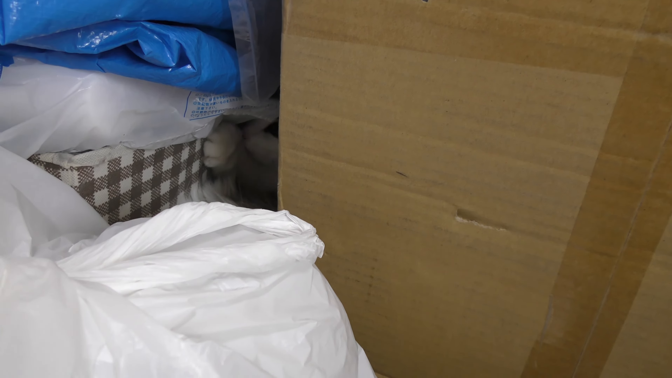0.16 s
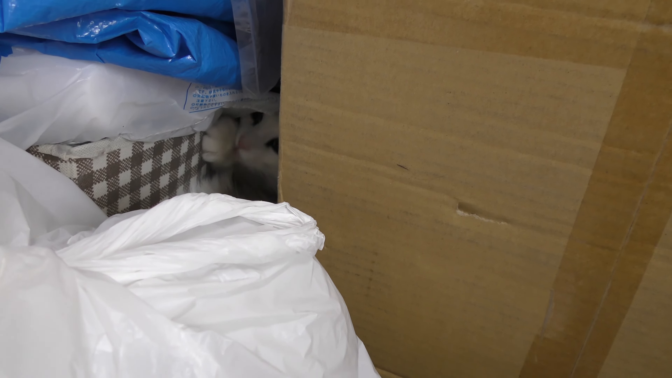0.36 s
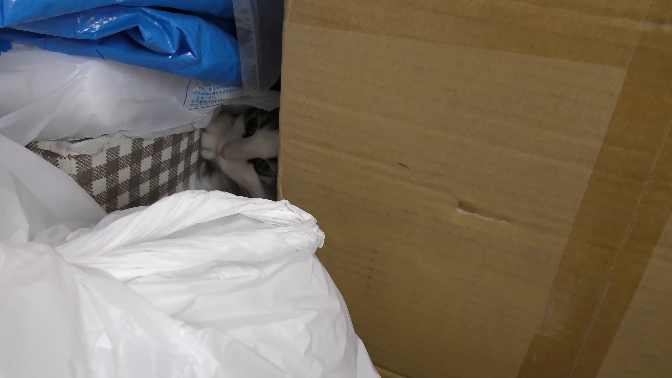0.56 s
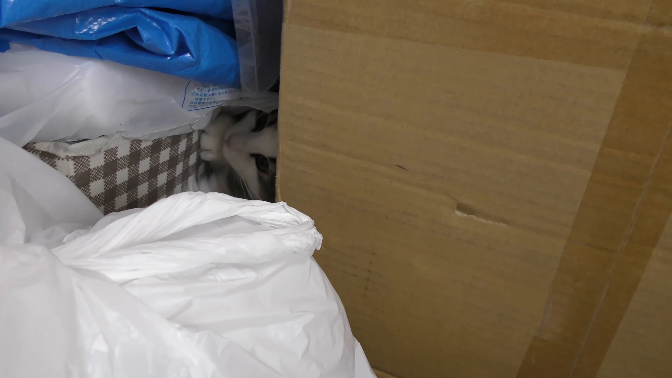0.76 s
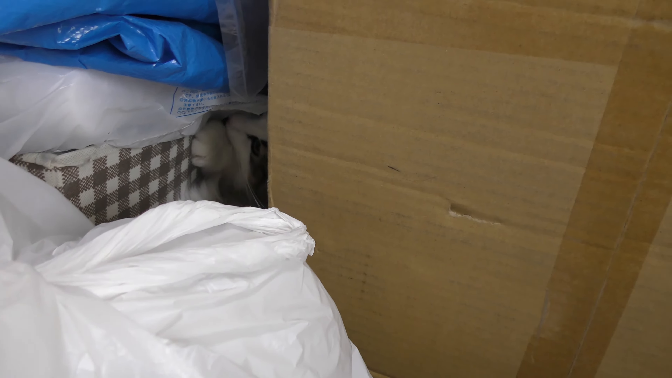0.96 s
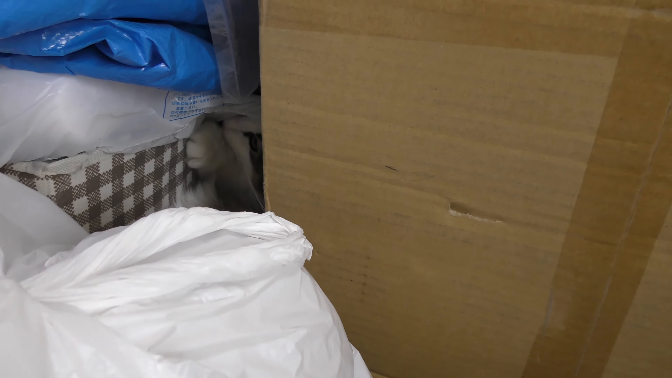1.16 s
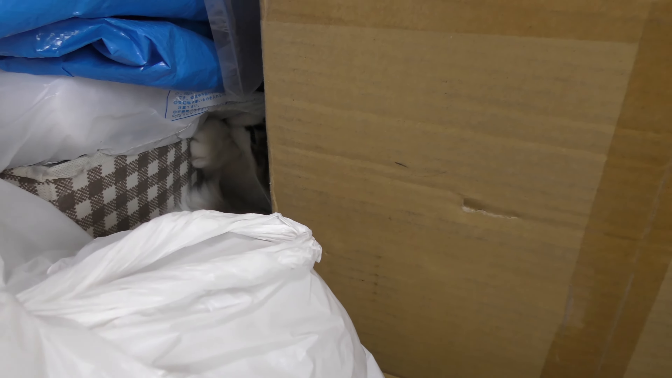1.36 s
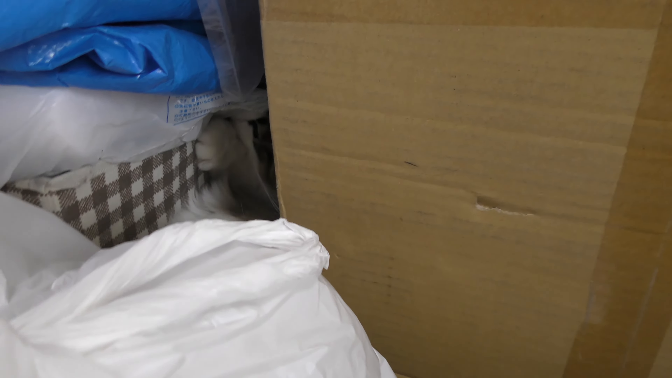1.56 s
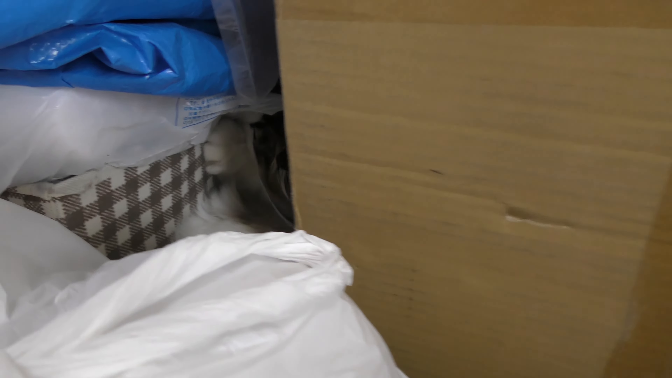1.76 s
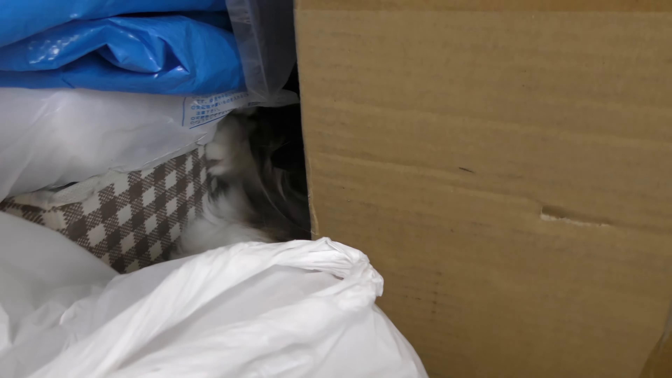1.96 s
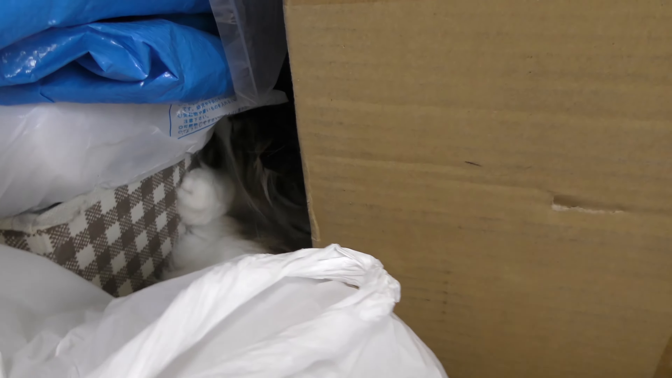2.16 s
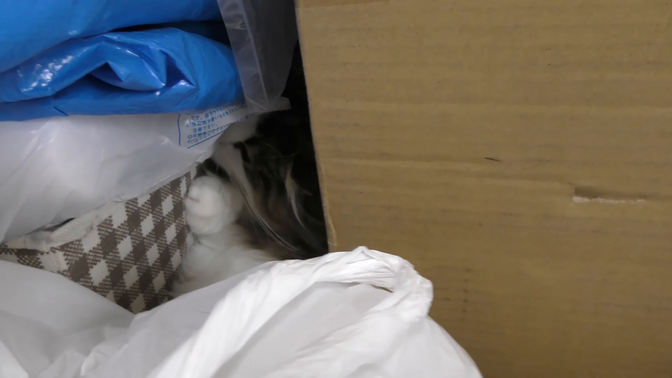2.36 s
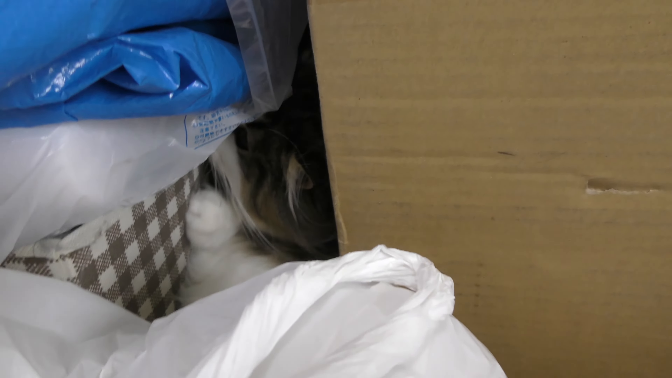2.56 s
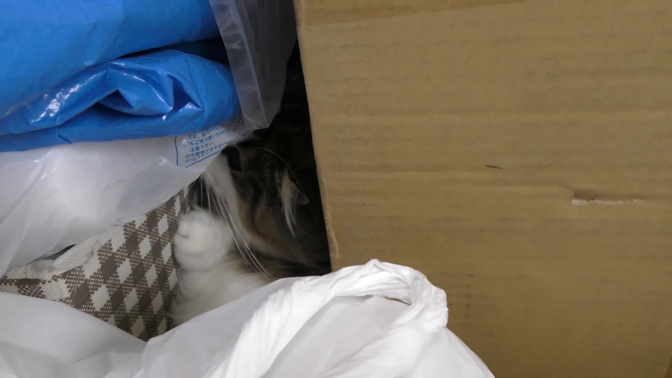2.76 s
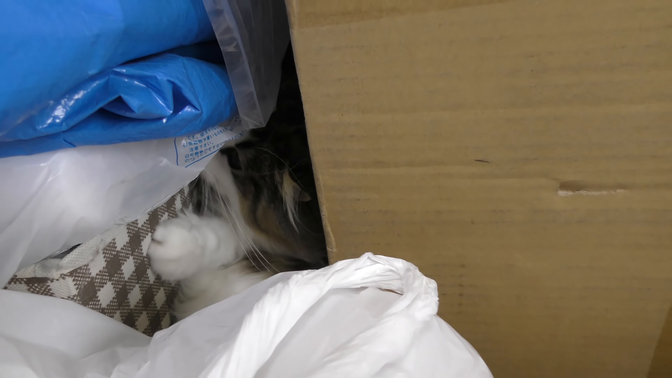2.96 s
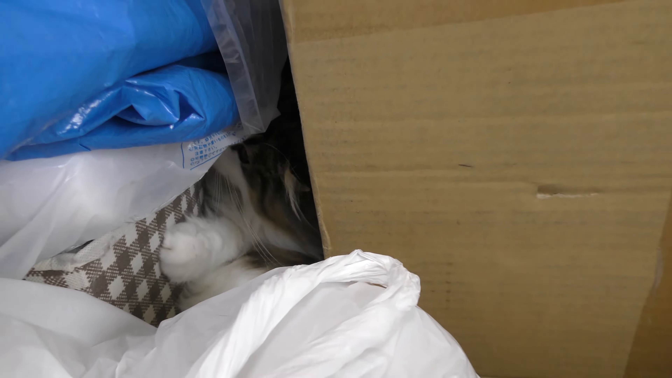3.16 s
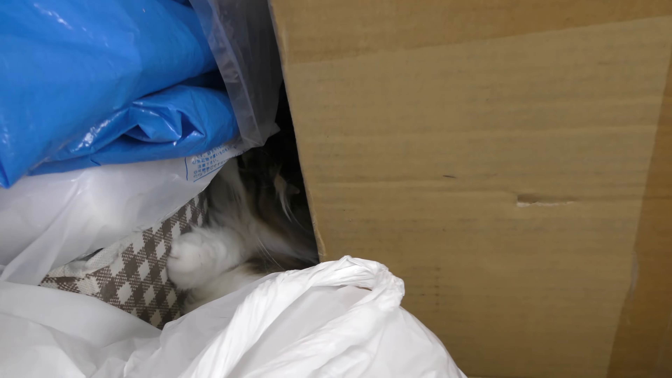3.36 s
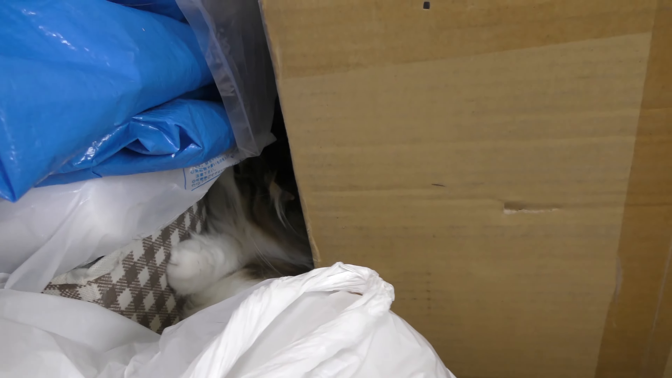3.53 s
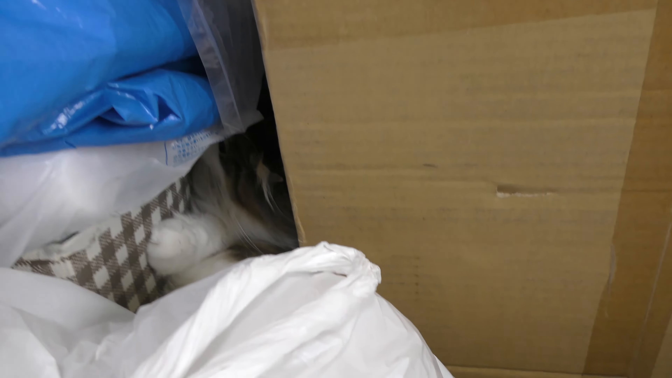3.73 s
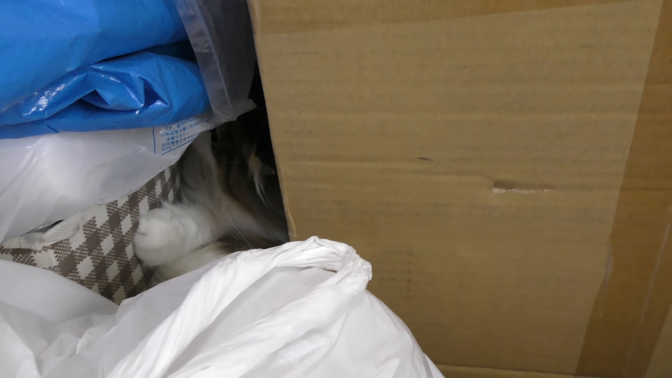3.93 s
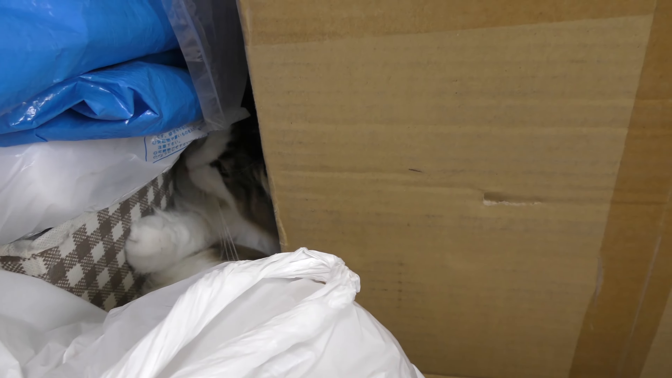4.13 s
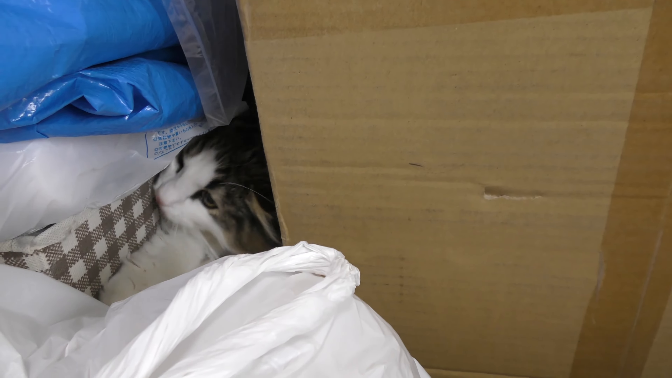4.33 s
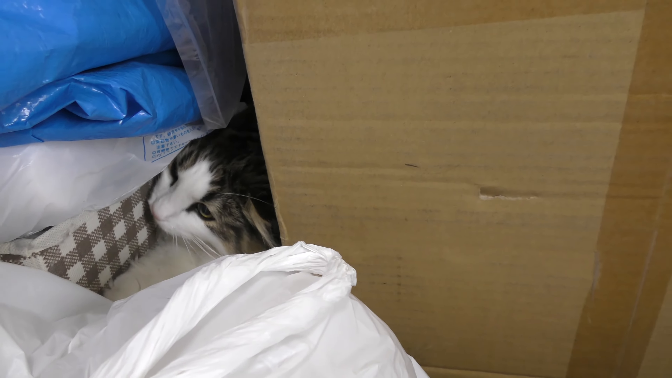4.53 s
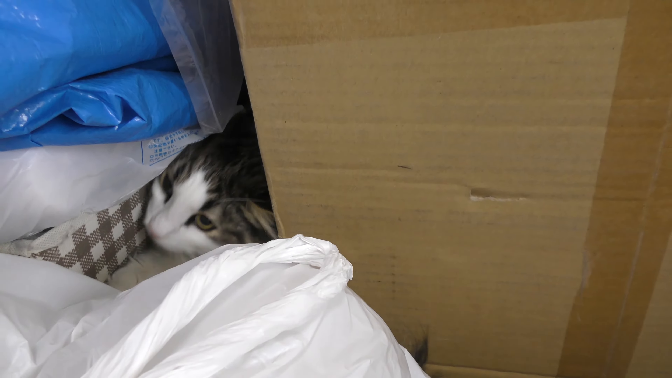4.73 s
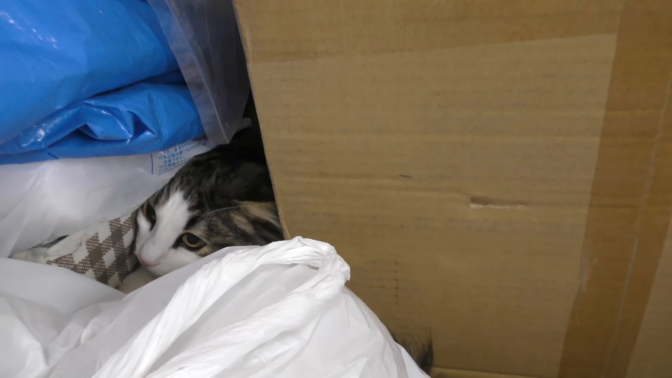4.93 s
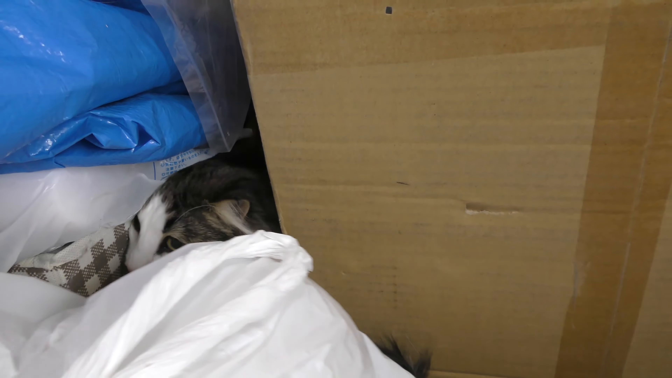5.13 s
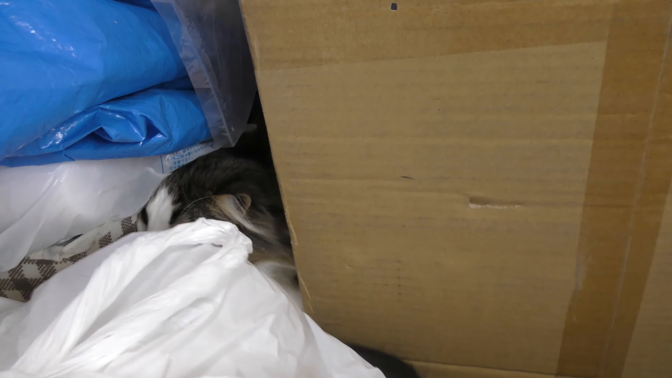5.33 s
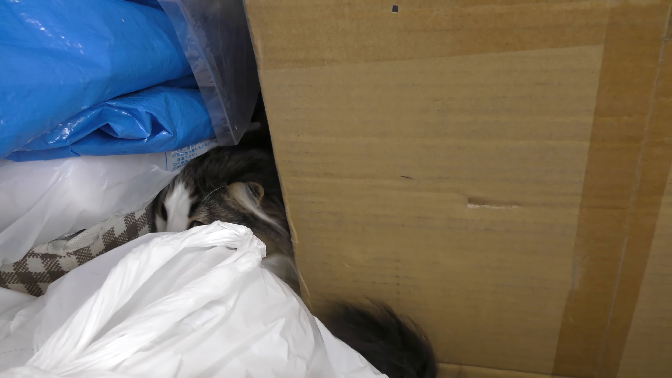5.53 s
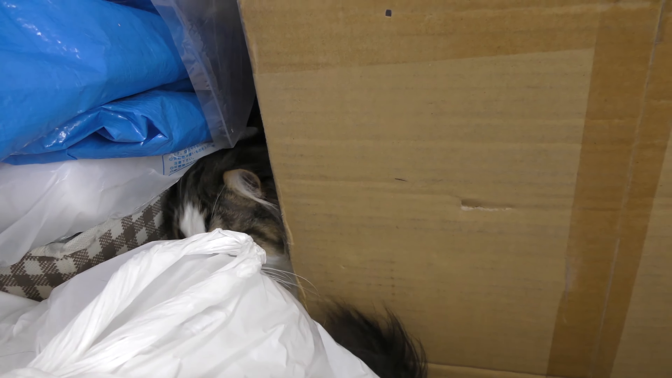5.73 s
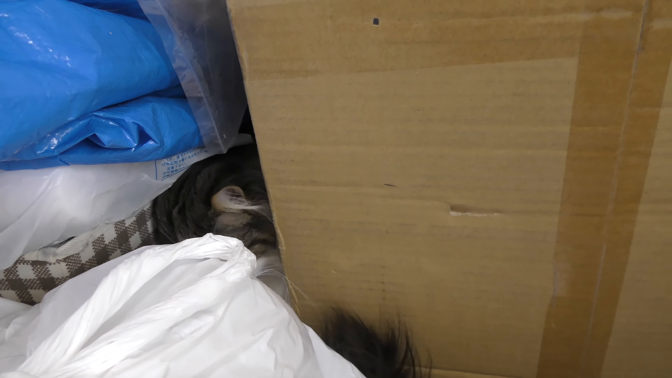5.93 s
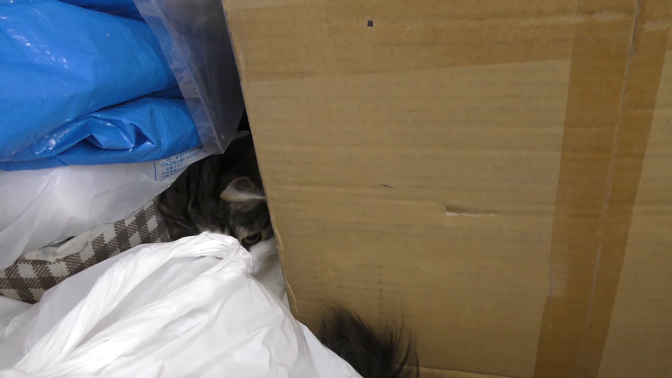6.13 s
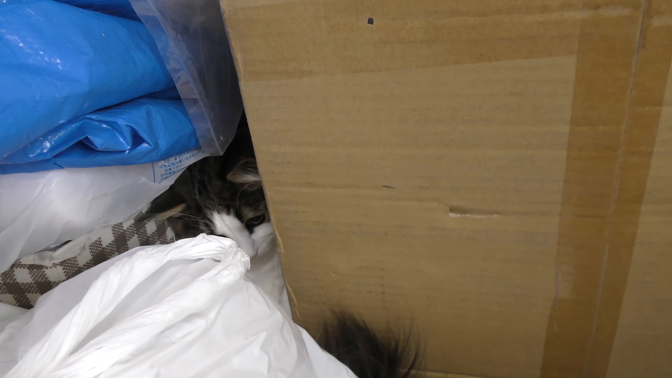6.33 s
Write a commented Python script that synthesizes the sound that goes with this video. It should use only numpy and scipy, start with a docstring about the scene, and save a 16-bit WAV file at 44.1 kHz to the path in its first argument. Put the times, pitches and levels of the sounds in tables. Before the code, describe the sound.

A cat squeezes between plastic bags and a cardboard box in a quiet room, close to a stereo microphone. Faint ticks and rustles grow into a burst of bright crinkling, with soft knocks and a dull rumble from the box. After a brief lull comes louder crackling, topped by one hollow thump with a quick claw scrape, then lighter crinkles. Faint hiss and a low hum lie underneath.

```python
"""In a quiet room, close to a stereo microphone, a cat pushes between plastic bags and a cardboard box.
The plastic buckles in short bright snaps over a finer rustle of tiny creases and sliding fur.
The box rumbles as the cat rubs it, rings when knocked and is scraped once by a claw.
Behind it all the room hisses faintly and a low hum sets in."""
import sys
import numpy as np
from scipy import signal
from scipy.io import wavfile

SR = 44100
rng = np.random.default_rng(int(sys.argv[2]) if len(sys.argv) > 2 else 0)


def transcribe(signal):
    """Save signal, clipped to [-1, 1], as a 16-bit WAV file at the path in sys.argv[1]."""
    frames = np.atleast_2d(signal).T
    limited = np.clip(frames, -1, 1)
    pcm = np.round(limited * 32767).astype(np.int16)
    wavfile.write(sys.argv[1], SR, pcm)


N = 286209

# how alike left and right sound for the bags and box: (frequency [Hz], likeness [0 to 1])
LIKENESS = [(60, 0.3), (180, 0.88), (550, 0.91), (1650, 0.81), (4970, 0.89), (15000, 0.85)]
# the tone of rustling plastic: (frequency [Hz], level [dB])
RUSTLE_TONE = [(350, -36), (600, -7.5), (832, -4), (1010, -1.5), (1240, 1), (2920, -0.5), (6880, -1.5),
               (7570, 1.5), (9290, 0), (11400, 1), (15600, -5)]
# the low pop, the middle and the high crackle of a snap: (low edge [Hz], high edge [Hz])
SNAP_BANDS = [(1000, 3000), (3500, 7500), (8000, 15500)]
# the clearest snaps of the plastic: (time [s], crackle level [dB], pop level [dB])
SNAPS = [(0.1249, -69, -47), (0.2014, -68, -47), (0.6136, -77, -44), (0.749, -66, -53.5),
         (0.8266, -50.5, -50), (0.857, -65, -58), (0.91, -48, -54), (0.9371, -62, -58), (0.9823, -53, -58),
         (1.01, -63, -60), (1.023, -58, -73), (1.0698, -59, -69), (1.0822, -52, -50.5),
         (1.2678, -63, -49.5), (1.2977, -49.5, -48.5), (1.409, -55, -55), (1.422, -56, -51),
         (1.438, -72, -44), (1.444, -73, -48.5), (1.4525, -72, -45), (1.566, -50, -53), (1.757, -43, -43),
         (1.773, -46, -43), (1.806, -48, -57), (1.8912, -38, -57), (1.9026, -44, -62), (1.918, -52, -46),
         (2.088, -51, -62), (2.1137, -31, -47), (2.1503, -42.5, -55), (2.167, -48, -60), (2.3241, -49, -62),
         (2.352, -42, -54), (2.3917, -42, -40.5), (2.4345, -38.5, -42), (2.46, -42, -42), (2.486, -51, -57),
         (2.5025, -37, -42), (2.509, -42, -46), (2.5195, -36, -44), (2.5466, -29, -38), (2.553, -31, -47),
         (2.5812, -33, -50), (2.595, -32.5, -45), (2.6047, -28, -39), (2.6184, -33, -50),
         (2.626, -34.5, -42), (2.637, -44, -52), (2.7111, -39, -43), (2.884, -55, -45), (2.9, -48, -56),
         (3.067, -48.5, -52), (3.102, -44.5, -51), (3.1462, -42, -54), (3.1804, -46, -54),
         (3.236, -51, -46), (3.253, -51, -51), (3.28, -57, -44), (3.301, -38.5, -47), (3.338, -38, -47),
         (3.3886, -45.5, -56), (3.463, -56, -52), (3.4755, -54, -56), (3.5054, -56, -59), (3.545, -48, -54),
         (3.7383, -60, -56), (3.782, -63, -52), (3.9328, -55, -62), (3.9377, -63, -45.5),
         (4.0348, -50, -60), (4.142, -50, -50), (4.354, -90, -36.5), (4.391, -43, -47), (4.4078, -46, -42),
         (4.5709, -48, -31.5), (4.575, -47, -33.5), (4.6239, -46, -56), (4.6502, -35, -42),
         (4.6908, -32, -49), (4.8789, -42, -57), (4.887, -35, -43), (4.933, -45, -41), (4.9503, -33.5, -43),
         (4.968, -38, -40), (4.9845, -37, -44), (5.039, -33, -44), (5.05, -37, -47), (5.084, -42, -41),
         (5.2017, -34, -38.5), (5.2295, -35, -38), (5.2431, -33, -34), (5.251, -39, -39.5),
         (5.312, -30.5, -40), (5.413, -33, -47), (5.5948, -41, -52), (5.663, -44, -43), (5.7378, -44, -43),
         (5.7665, -36.5, -51), (5.793, -42, -59), (5.8619, -45.5, -42), (5.9298, -42.5, -46.5),
         (6.007, -51, -49), (6.0176, -44.5, -45.5), (6.0842, -43.5, -45), (6.145, -40.5, -49),
         (6.197, -37.5, -48), (6.214, -41, -44), (6.281, -40, -39), (6.3464, -43, -43),
         (6.4476, -42, -41.5), (6.4737, -41, -43.5)]


def plastic_bags(rustle_db, dull_db, creases_per_s, size_db, colour_db, snap_t60):
    """Each crease that buckles is a tiny burst of noise with its own tone; big ones are snaps."""
    crease_t60, crack_t60, echo_t60 = .0035, .002, .07  # seconds to fade by 60 dB
    crack_db, echo_db = 6.5, -18.0
    crease_at = np.flatnonzero(rng.random(N) < creases_per_s * from_db(3.0 * drift(30.0)) / SR)
    sizes_db = size_db * np.minimum(rng.exponential(1, len(crease_at)), 4.0)
    brightness = rng.standard_normal(len(crease_at))
    times, crackle_db, pop_db = np.transpose(SNAPS)
    snap_at = (times * SR).astype(int)
    middle_db = -6 + 0.52 * crackle_db + 0.48 * pop_db
    pan_db = rng.standard_normal(len(times)) * [[1], [-1]]  # snaps come from all over the heap
    low, high = np.transpose(SNAP_BANDS)
    # how loud white noise must be to give each band its level
    white_db = np.array([pop_db, middle_db, crackle_db]).T - 10 * np.log10((high - low) / (SR / 2))
    out = 0
    for hz, noise, band in stereo_bands(573, LIKENESS, count=14):
        octave = np.log2(hz / 5000)
        tone_db = colour_db * (0.34 * brightness * octave + rng.standard_normal(len(crease_at)))
        jolts = np.zeros(N)
        jolts[crease_at] = from_db(2 * (sizes_db + tone_db))  # doubling the dB gives power
        creases = swell(jolts, crease_t60) / creases_per_s
        slide = .55 * (1 + 1.04 * max(-octave, 0))  # sliding fur is duller than the creases
        lift_db = dull_db * np.clip(-octave / 1.28, 0, 1)  # in full from about 2 kHz down
        rustle = slide + creases / creases.mean()
        rustle *= from_db(2 * (rustle_db + lift_db + at_hz(RUSTLE_TONE, hz)))

        snap_db = np.array([np.interp(np.log(hz), np.log(low * high) / 2, row) for row in white_db])
        snap_db -= 9.0 * max(np.log2(1300 / hz), 0)  # thin plastic gives off little bass
        snap_db += 2.75 * rng.standard_normal(len(snap_at))
        snaps = np.zeros((2, N))
        snaps[:, snap_at] = from_db(2 * (snap_db + pan_db))
        crack = from_db(2 * crack_db) * die_away(snaps, crack_t60)  # a snap's sharp start
        echo = from_db(2 * echo_db) * die_away(snaps.mean(axis=0), echo_t60)  # from the nook
        power = rustle + swell(snaps, snap_t60) + crack + echo
        out = out + signal.sosfilt(band, noise * np.sqrt(power))
    return out


# the notes the box rings at: (pitch [Hz], level when rubbed [dB], time to fade by 60 dB [s])
BOX_NOTES = [(72.6, -8, 0.026), (101, -12, 0.09), (125.6, -12.5, 0.07), (170.5, -3.5, 0.099),
             (227.4, 3, 0.041), (281.3, -1.5, 0.07), (352, 2.5, 0.049), (444.7, 4, 0.03), (506, -9, 0.033),
             (717, -6, 0.014), (817, -7, 0.03)]
# knocks on the box: (time [s], strength [dB], pitch of the struck panel [Hz], reach [octaves])
KNOCKS = [(0.614, -29.5, 258, 0.95), (1.295, -41.5, 198, 0.96), (1.512, -35.5, 253, 0.59),
          (1.714, -29.5, 154, 1), (1.764, -32.5, 166, 0.59), (1.809, -30.5, 204, 1),
          (2.1125, -24, 191, 0.94), (2.121, -22.5, 560, 0.5), (2.132, -17, 116.3, 0.18),
          (2.133, -20.5, 324, 0.27), (2.141, -25.5, 340, 0.23), (2.253, -38, 259, 0.99),
          (2.59, -37.5, 194, 0.44), (2.719, -39, 157, 0.32), (4.108, -39.5, 266, 0.62),
          (4.257, -34, 155, 0.55), (4.375, -20, 211, 0.23), (4.514, -35, 312, 0.49),
          (4.579, -32, 380, 0.23), (4.626, -28, 124, 0.3), (4.669, -38, 190, .35),
          (4.782, -26.5, 250, 0.37), (4.8, -29, 80, 0.39), (4.829, -30.5, 175, 0.19),
          (5.33, -27.5, 198, 0.53), (5.392, -22.5, 180, 0.65), (5.417, -3, 635, 0.24),
          (5.422, -25, 285, 0.63), (5.442, -4.5, 86.7, 0.13), (5.758, -26, 251, 0.41)]


def cardboard_box(rumble_db, rubs_per_s):
    """Soft rubs shake the whole box; a knock mostly rings the notes near its panel's pitch."""
    times, strength_db, pitch_hz, reach_octaves = np.transpose(KNOCKS)
    knock_at = (times * SR).astype(int)
    rubbed = rng.random(N) < rubs_per_s / SR
    rubs = rubbed * from_db(1.52 * np.minimum(rng.exponential(1, N), 4.0))
    rumble, knocks = np.zeros((2, 2, N))
    for k, (hz, level_db, t60) in enumerate(BOX_NOTES):
        alike = at_hz(LIKENESS, hz)
        mid, side = ring(rubs * rng.standard_normal((2, N)) * from_db(level_db), hz, t60)
        rumble += np.sqrt(1 + alike) * mid + np.sqrt(1 - alike) * side * [[1], [-1]]
        # each note reaches the two sides of the microphone unequally
        pan_db = (at_hz(MIC_BALANCE, hz) + 3.5 * rng.standard_normal(len(knock_at))) / 2
        share_db = -4.0 - 7.7 * (np.log2(hz / pitch_hz) / reach_octaves) ** 2
        clicks = np.zeros((2, N))
        clicks[:, knock_at] = from_db(strength_db + share_db + pan_db * [[1], [-1]])
        knocks += (-1) ** k * ring(clicks, hz, t60)
    # fur and paws are soft, and light panels give off no deep bass
    soft = signal.butter(2, [70, 1000], "band", fs=SR, output="sos")
    return signal.sosfilt(soft, from_db(rumble_db) * rms_one(rumble) + knocks)


# one quick scrape on the cardboard: (time [s], level [dB])
SCRAPE = [(5.37, -68), (5.385, -42), (5.407, -30.5), (5.413, -49)]


def claw_scrape():
    """A dragging claw makes noise that rings one note of the cardboard."""
    level_db, = in_time([(0, -99), *SCRAPE, (N / SR, -99)])
    return from_db(level_db) * rms_one(ring(rng.standard_normal(N), hz=1012, t60=0.026))


# the tone of the room's hiss: (frequency [Hz], level [dB])
ROOM_TONE = [(18, -29), (30, -2), (75, 6), (108, 2.5), (197, 6), (577, -15), (658, -30), (790, -19.5),
             (1140, 9), (1300, -4), (2560, -10), (5920, -28), (9740, -24), (11400, -4), (15600, -25)]
# how alike left and right sound for the room: (frequency [Hz], likeness [0 to 1])
ROOM_LIKENESS = [(60, 0.22), (240, 0.19), (950, 0.09), (3770, 0.051), (15000, 0.41)]


def room_hiss(level_db, flicker_db):
    """Steady hiss and rumble, flickering a little band by band."""
    hiss = 0
    for hz, noise, band in stereo_bands(28.2, ROOM_LIKENESS, count=17):
        gain = from_db(at_hz(ROOM_TONE, hz) + flicker_db * drift(3.0))
        hiss = hiss + gain * signal.sosfilt(band, noise)
    return from_db(level_db) * rms_one(hiss)


# the hum creeping in: (time [s], level [dB])
HUM = [(0, -76), (2.6, -67), (2.9, -66), (4.5, -61.5), (6.49, -62.5)]


def hum(hz):
    """One low tone, like that of an electric motor."""
    level_db, = in_time(HUM)
    return np.sqrt(2) * from_db(level_db) * np.sin(2 * np.pi * hz * np.arange(N) / SR)


# which side of the microphone is louder: (frequency [Hz], left minus right [dB])
MIC_BALANCE = [(60, -4), (240, 0.5), (950, 2), (3770, 1), (15000, 1.5)]


def stereo_bands(low_hz, likeness, count):
    """For each band, give its centre in Hz, stereo white noise and a filter that picks out the band."""
    edges = np.geomspace(low_hz, 17000, count + 1)
    white = rng.standard_normal((2, 2, N))
    for k, (low, high) in enumerate(zip(edges, edges[1:])):
        hz = np.sqrt(low * high)
        alike = at_hz(likeness, hz)
        mid, side = white[k % 2]
        noise = np.sqrt((1 + alike) / 2) * mid + np.sqrt((1 - alike) / 2) * side * [[1], [-1]]
        band = signal.butter(2, [low, high], "band", fs=SR, output="sos")
        yield hz, noise * from_db(at_hz(MIC_BALANCE, hz) / 2 * np.array([[1], [-1]])), band


def from_db(db):
    """Turn decibels into a number to multiply a sound by."""
    return 10 ** (np.asarray(db) / 20)


def rms_one(x):
    """Scale a sound to an average power of 1."""
    return x / np.sqrt(np.mean(x ** 2) + 1e-20)


def in_time(rows):
    """Join a table's points into curves over time."""
    times, *columns = np.transpose(rows)
    return [np.interp(np.arange(N) / SR, times, column) for column in columns]


def at_hz(points, hz):
    """Look up a table's value at one frequency."""
    frequencies, values = np.transpose(points)
    return np.interp(np.log(hz), np.log(frequencies), values)


def drift(rate_hz):
    """A slow random wobble, about 1 in size."""
    r = np.exp(-80 * np.pi * rate_hz / SR)
    slow = signal.lfilter([1], [1, -2 * r, r * r], rng.standard_normal(N // 40 + 2002))[2000:]
    return np.interp(np.arange(N) / 40, np.arange(len(slow)), rms_one(slow))


def ring(clicks, hz, t60):
    """Each click starts a pure tone that fades by 60 dB in t60 seconds."""
    r, w = from_db(-60 / (t60 * SR)), 2 * np.pi * hz / SR
    return signal.lfilter([0, np.sin(w)], [1, -2 * r * np.cos(w), r * r], clicks + 1e-18)


def die_away(power, t60):
    """Each jolt of power fades by 60 dB in t60 seconds."""
    return signal.lfilter([1], [1, -from_db(-120 / (t60 * SR))], power + 1e-18)


def swell(power, t60):
    """Each jolt of power rises quickly to its own height and fades smoothly."""
    r = from_db(-120 / (t60 * SR))
    return signal.lfilter([(np.e * (1 - r)) ** 2 / 2], np.poly([r, r, r]), power + 1e-18)


# how hard the cat pushes, heard as rustle: (time [s], level [dB])
PUSH = [(0.0, -74), (0.115, -63), (0.34, -72.5), (0.9, -68.5), (1.073, -62), (1.13, -67.5), (1.21, -69),
        (1.417, -58.5), (1.522, -57), (1.726, -48), (1.841, -56), (1.906, -48), (1.97, -59), (2.045, -60.5),
        (2.115, -45.5), (2.2, -54.5), (2.41, -47.5), (2.55, -40), (2.614, -45), (2.669, -56.5), (2.8, -66),
        (2.873, -58), (2.98, -62), (3.048, -51.5), (3.2, -54), (3.253, -50.5), (3.3, -55), (3.387, -53.5),
        (3.512, -68.5), (4.071, -70.5), (4.141, -61.5), (4.25, -68.5), (4.395, -51), (4.49, -57),
        (4.61, -49), (4.65, -39.5), (4.69, -38), (4.744, -41), (4.804, -34), (4.859, -44.5), (4.919, -52.5),
        (4.979, -44.5), (5.083, -40.5), (5.21, -39), (5.245, -35), (5.403, -31.5), (5.59, -56),
        (5.672, -44.5), (5.767, -45.5), (5.817, -52.5), (5.887, -50), (5.981, -56.5), (6.061, -59),
        (6.091, -47.5), (6.136, -51.5), (6.171, -43), (6.425, -54), (6.485, -47.5)]
# how much the cat leans on the box: (time [s], extra rumble [dB], extra dull rubbing [dB])
LEAN = [(0, -1, 0), (.6, 2, -1.5), (1.07, -1, -4), (1.45, 1, 3.5), (1.84, -2.5, 0), (2.1, 5.5, 1.5),
        (2.45, -6.5, -1.5), (2.75, 5.5, 2.5), (3.25, -5.5, -1), (3.7, 6.5, 4), (4.15, 0, 1.5),
        (4.45, 6.5, 3.5), (4.85, 0, -1.5), (5.2, 0, 0), (5.42, -0.5, -1), (5.8, 1, 1), (6.1, -3.5, -1),
        (6.49, -0.5, -1)]


def scene():
    """The cat's push drives both the bags and the box, over the quiet room."""
    rustle_db, = in_time(PUSH)
    lean_db, rub_db = in_time(LEAN)
    force_db = rustle_db + 50  # 0 is a firm push
    creases_per_s = 470.0 * from_db(.3 * force_db)  # a harder push buckles more creases
    dull_db = 5 - 0.2549 * force_db + rub_db  # a lighter push sounds duller
    rumble_db = -53 + 0.8169 * force_db + lean_db
    bags = plastic_bags(rustle_db, dull_db, creases_per_s, size_db=2.5, colour_db=4.0, snap_t60=0.0083)
    box = cardboard_box(rumble_db, rubs_per_s=410.0)
    return bags + box + claw_scrape() + room_hiss(level_db=-59, flicker_db=2.5) + hum(hz=121.8)


# dips and a peak of the microphone in its housing: (frequency [Hz], width [Hz], gain [dB])
MIC_TONE = [(814, 124, -5.5), (7580, 800, -4.5), (9460, 540, 2)]


def record(dry):
    """The microphone colours the sound, and the highest treble is cut."""
    for hz, width_hz, gain_db in MIC_TONE:
        peak = signal.iirpeak(hz, hz / width_hz, fs=SR)
        dry = dry + (from_db(gain_db) - 1) * signal.lfilter(*peak, dry)
    treble_cut = signal.ellip(12, .5, 75, 15700, fs=SR, output="sos")
    return signal.sosfilt(treble_cut, dry)


dry = scene()
out = record(dry)
transcribe(out)
```